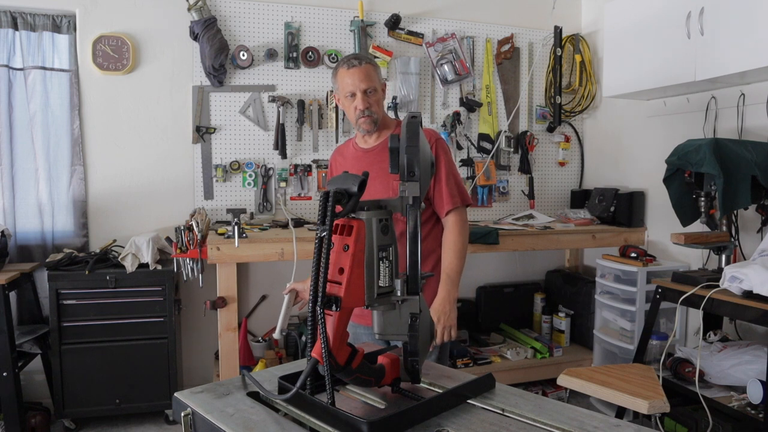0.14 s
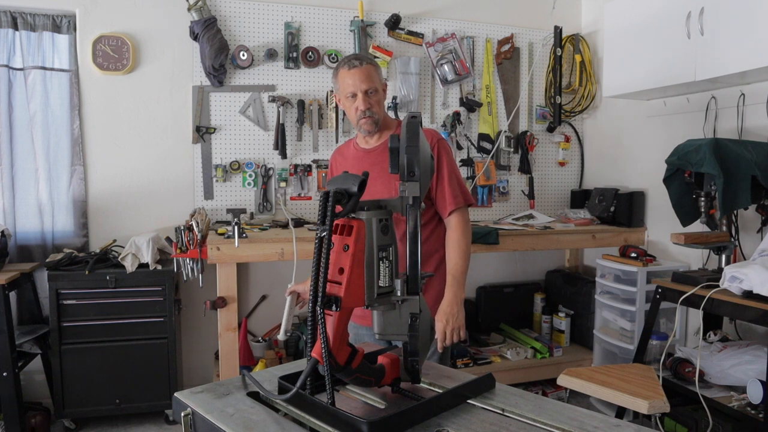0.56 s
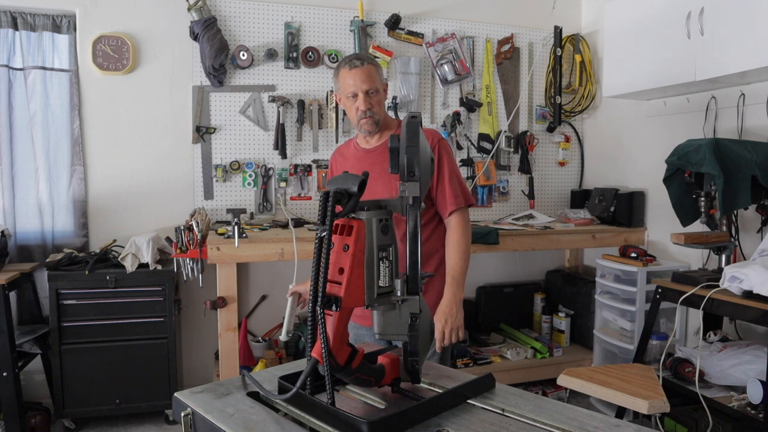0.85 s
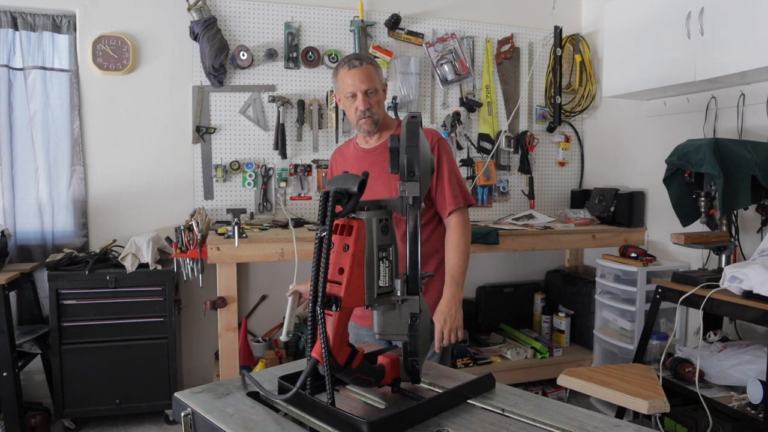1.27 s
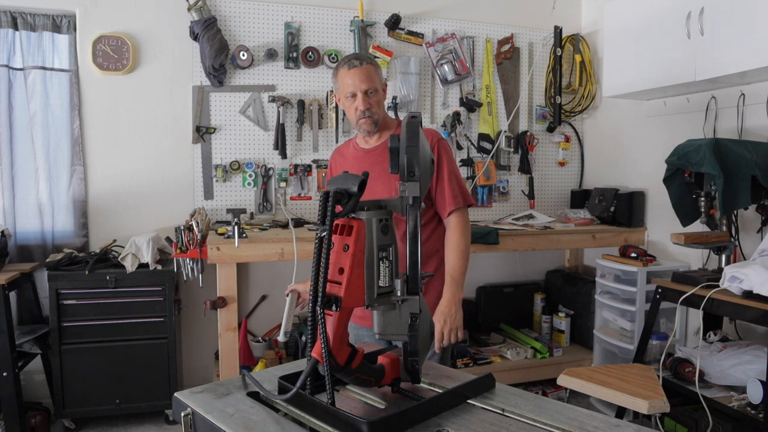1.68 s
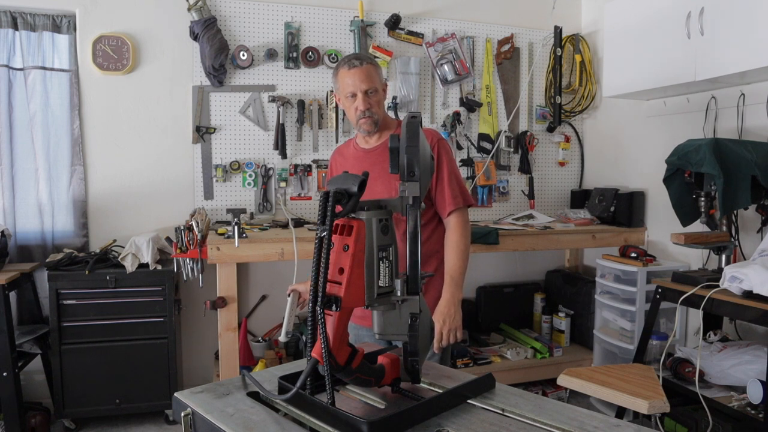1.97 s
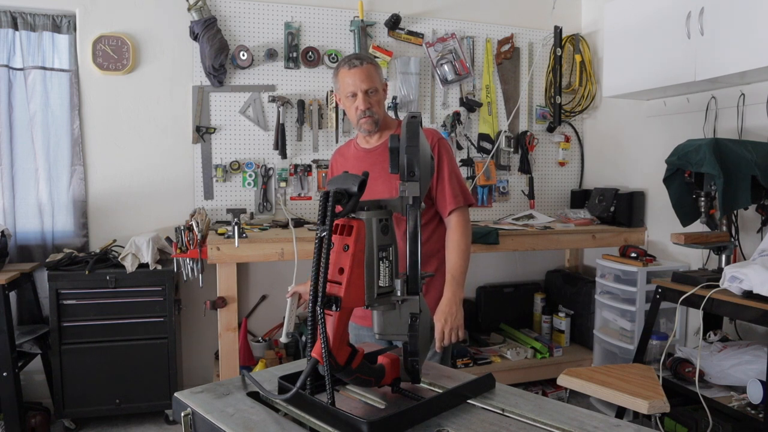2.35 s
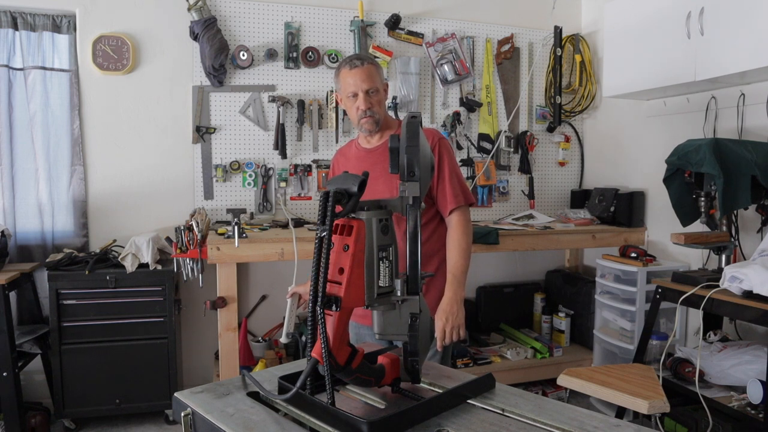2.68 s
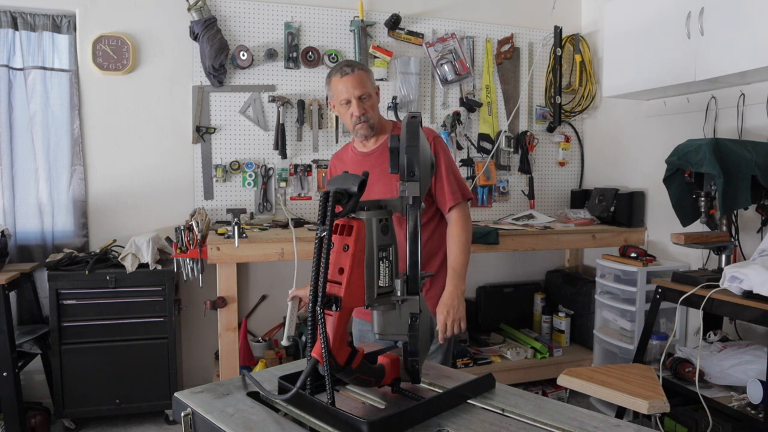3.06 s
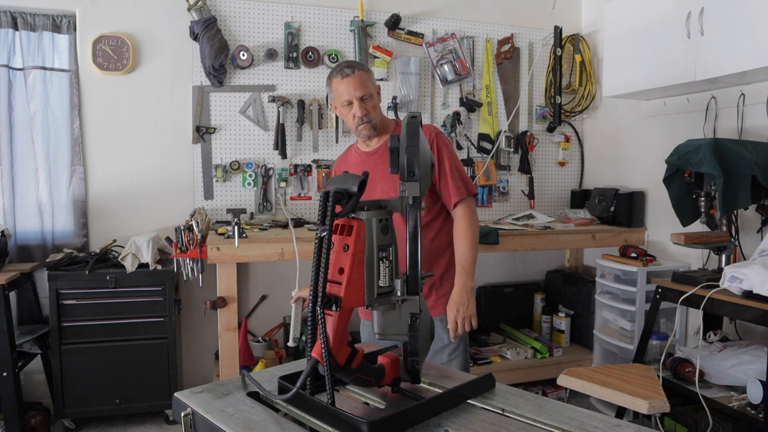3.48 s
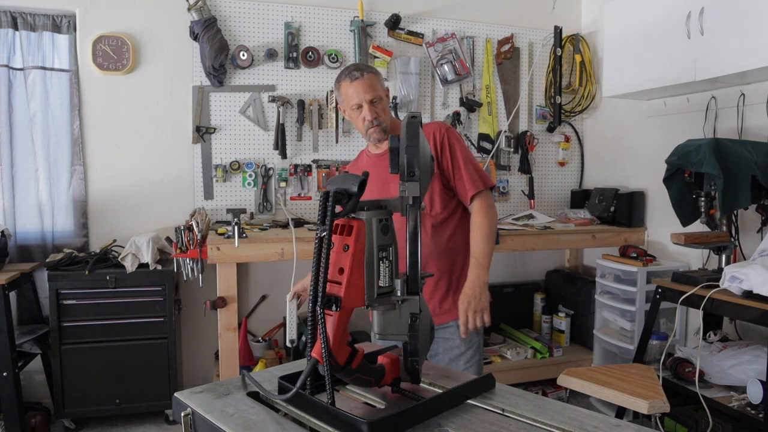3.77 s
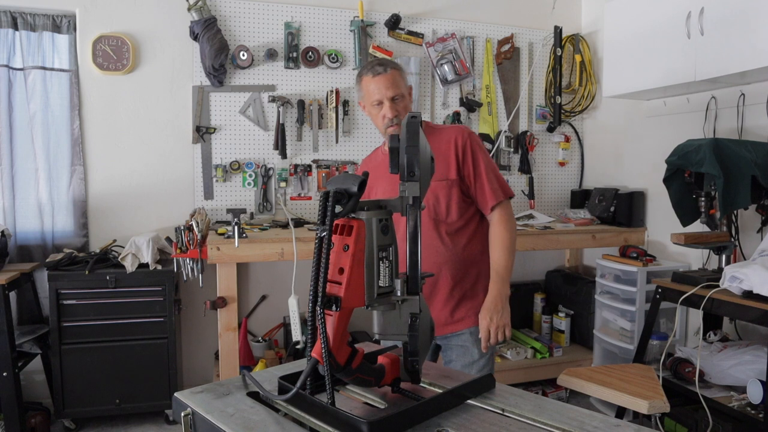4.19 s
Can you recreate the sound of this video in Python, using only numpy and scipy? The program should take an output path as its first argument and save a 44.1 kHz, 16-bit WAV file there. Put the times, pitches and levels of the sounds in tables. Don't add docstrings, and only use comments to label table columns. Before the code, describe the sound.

A portable band saw runs free in a garage workshop, picked up by one microphone a few metres away with short room reverberation. At the start it is already fast and still gaining speed: a loud, harsh, mid-to-high gear rattle with whining tones and rushing cooling air. At about 0.55 s the power is released and pitch and brightness sink; a very brief dropout interrupts the coasting at 0.76 s. The rattle dies by about 1.5 s into a rough blade whirr and low ringing, with tiny very high bearing chirps from 1.5 to 1.8 s. Another momentary dropout at 1.96 s coincides with an abrupt restart; the motor surges and rises rapidly, with low stand shudders. Released at about 3.2 s, it winds down again, its rattle thinning away around 4 s, ending with faint thin squeaks from 4.15 to 4.35 s over quiet shop air, mains hum and slight hiss.

```python
import sys
import numpy as np
from scipy import signal
from scipy.fft import rfft, irfft
from scipy.io import wavfile
from scipy.ndimage import uniform_filter1d

SR = 44100
rng = np.random.default_rng(int(sys.argv[2]) if len(sys.argv) > 2 else 0)


def master(y):
    cut = np.clip(np.atleast_2d(y).T, -1, 1)
    pcm = np.round(cut * 32767)
    wavfile.write(sys.argv[1], SR, pcm.astype(np.int16))


def invert_db(x):
    u = np.asarray(x, float) / 20
    return 10 ** u


N = 191161
TIME = np.arange(N) / SR
HZ = np.maximum(np.fft.rfftfreq(N, 1 / SR), 1)
FREE_HZ = 258

# (frequency [Hz], level [dB])
HOUSING_COLOUR = [(35, -86), (60, -41.5), (100, -34.5), (242, -21), (328, -15), (573, -7.5), (1180, -7),
                  (2260, 1.5), (2540, -1), (2920, 1.5), (3440, -1), (4050, -1.5), (6010, -10.5),
                  (8520, -16.5), (15600, -39.5)]
# (on [s], off [s], shaft rate when pulled [Hz], spin-up time constant [s])
TRIGGER_PULLS = [
    (0, .54, 219.1, .416),
    (1.965, 3.215, 56, .36),
]


def saw():
    # (frequency [Hz], level [dB])
    fan_colour = [(300, 7.5), (1200, 0.5), (2200, -3.5), (2900, 9), (3500, 4), (4500, -2), (6200, 4.5),
                  (12000, -4)]
    stand_hz, stand_width_hz = 101, 4
    mains_hz, mains_db = 120, -41.5

    speed, drive = shaft()
    hz = np.maximum(speed, 5)
    run_db, boom_db, ring_db, treble_db, stand_db = balance(speed, drive)
    turns = np.cumsum(hz) / SR
    teeth = level(rattle(turns, hz), 0)
    metal = level(causal(teeth + whines(turns, hz, drive), body_db(HZ)), 0)
    air_db = shape_db(HOUSING_COLOUR, HZ) + shape_db(fan_colour, HZ)
    fan = level(causal(rng.standard_normal(N), air_db), -2.86) * (hz / 250) ** 1.5

    spectrum = rfft(metal + fan)
    boom = 1 / (1 + (HZ / 1000) ** 4)
    treble = 1 / (1 + (5600 / HZ) ** 4)
    middle = np.maximum(1 - boom - treble, 0)
    parts = [(boom, boom_db), (treble, treble_db), (middle, 0)]
    housing = sum(invert_db(db) * irfft(spectrum * share, N) for share, db in parts)

    stand = invert_db(stand_db) * modes(teeth, [(stand_hz, stand_width_hz, 0)])
    field = drive * invert_db(mains_db + 2.5 * walk(8)) * np.sin(2 * np.pi * mains_hz * TIME)
    return invert_db(run_db) * (housing + invert_db(ring_db) * whirr(hz) + stand + field)


def shaft():
    friction_hz_per_s, drag_per_s, current_fade_s = 135, .51, .05
    offset_hz = friction_hz_per_s / drag_per_s
    hz, drive = np.zeros(N), np.zeros(N)
    for on, off, start_hz, spin_up in TRIGGER_PULLS:
        rising = FREE_HZ - (FREE_HZ - start_hz) * np.exp(-(np.minimum(TIME, off) - on) / spin_up)
        slowing = np.exp(-drag_per_s * np.maximum(TIME - off, 0))
        speed = (rising + offset_hz) * slowing - offset_hz
        current = np.clip(.5 + (off - TIME) / current_fade_s, 0, 1)
        hz = np.where(TIME >= on, speed, hz)
        drive = np.where(TIME >= on, current, drive)
    return hz, drive


def balance(speed, drive):
    # (shaft rate [Hz], level [dB])
    loudness = [(-19, -78), (-1, -66), (17, -50), (32.5, -38.5), (47, -29.5), (64.5, -27), (68, -24),
                (145, -23), (238.5, -22)]
    fade_lead = [3, -1.5]
    # (time [s], length [s], rise [dB])
    shudders = [
        (.62, .1, 9),
        (.95, .3, 7),
        (2.05, .15, 17),
        (2.43, .22, 14),
        (3.1, .4, 8),
        (3.6, .35, 11),
    ]
    steady_db = -25.5

    load = drive * (1 - speed / FREE_HZ)
    octaves = np.log2(np.maximum(speed, 1) / FREE_HZ)
    lead_hz = np.where(TIME < TRIGGER_PULLS[1][0], *fade_lead)
    coast_db = np.interp(speed - lead_hz, *np.transpose(loudness))
    dying_db = np.maximum(steady_db - coast_db, 0)

    run_db = coast_db + 6 * load
    boom_db = np.maximum(2 + 9.5 * octaves, -9.5) + 9.5 * load + 0.25 * dying_db
    treble_db = np.maximum(5.5 + 5 * octaves, -14) + 1.5 * load
    treble_db = treble_db - .2 * np.minimum(dying_db, 12)
    ring_db = np.minimum(-21.5 + 1.4 * dying_db, -4.5)
    shudder_db = sum(db * np.exp(-(2 * (TIME - s) / length) ** 2) for s, length, db in shudders)
    stand_db = -46 + 0.68 * dying_db + shudder_db
    return run_db, boom_db, ring_db, treble_db, stand_db


def rattle(turns, hz, per_tooth=1.5, scatter_db=3.5, throb=0.11):
    chance = rng.random((3, N))
    share = np.clip(per_tooth * 9 * np.maximum(hz, 40) / SR, 0, 1)
    size_db = np.minimum(-scatter_db * np.log(chance[2] + 1e-9), 12)
    sign = np.sign(chance[1] - .5)
    hits = (chance[0] < share) * sign * invert_db(size_db) / np.sqrt(share)
    scrape = level(rng.standard_normal(N), 3.3)
    lopsided = 1 + throb * np.cos(2 * np.pi * turns)
    return lopsided * (level(hits, 0) + scrape) * invert_db(0.95 * walk(3.1))


def whines(turns, hz, drive):
    # (multiple of shaft rate, driven level [dB], coasting level [dB])
    orders = [(1, -22, -17), (2, -19, -22), (7, -28, -36), (8, -26, -34), (9, -13, -18), (10, -25, -30),
              (11.5, -23, -36), (12, -12.5, -30), (12.5, -16, -36), (16, -15, -30), (18, -20, -25),
              (24, -16, -23), (27, -25, -28), (37.2, -19.5, -21), (42, -20, -21), (46.2, -21, -32)]
    # (multiple of shaft rate, driven level [dB], coasting level [dB])
    brushes = [(48, -14.5, -11), (60.4, -23, -21), (72, -17, -11), (96, -22, -11)]
    cap_hz, cap_width_hz = 10900, 3400

    wobble = lines(orders[:2], turns, hz, drive) * np.sqrt(np.minimum(200 / hz, 1.5))
    gears = lines(orders[2:], turns, hz, drive) * (hz / 235) ** 2
    cap = 1 / (1 + (2 * (HZ - cap_hz) / cap_width_hz) ** 4)
    commutator = irfft(rfft(lines(brushes, turns, hz, drive)) * cap, N)
    return wobble + gears + commutator


def lines(orders, turns, hz, drive, unsteady_db=2.3, drift=.04):
    out = np.zeros(N)
    for k, driven_db, coast_db in orders:
        db = coast_db + (driven_db - coast_db) * drive + unsteady_db * walk(12)
        cycles = k * turns + drift * walk(25) + rng.random()
        audible = k * hz < .4 * SR
        out += invert_db(db) * audible * np.sin(2 * np.pi * cycles)
    return out


def body_db(hz):
    # (frequency [Hz], width [Hz], boost [dB])
    resonances = [(259, 46, 4.5), (386, 44, 2), (572.2, 13.6, 11), (653, 114, 5.5), (729, 81, 6),
                  (840, 36, 5.5), (1427, 170, 4), (1740, 94, 2.5), (1846, 34, 3.5), (1890, 43, 3.5),
                  (2140, 20, 0.5), (2257, 85, 4), (2370, 51, 10), (2626, 930, -6), (2920, 140, -1),
                  (3080, 50, -1), (3332, 740, -10.5), (4013, 59, 4.5), (4250, 50, -2.5), (4800, 92, 3),
                  (1693, 41, 3), (5700, 81, -2.5), (6160, 1140, -5), (6900, 110, 3.5), (7320, 110, 6.5),
                  (8450, 390, 6.5), (9500, 110, -12), (10720, 460, 3.5), (12862, 350, 2), (14200, 400, 0)]
    peaks_db = sum(db / (1 + (2 * (hz - f) / w) ** 2) for f, w, db in resonances)
    return shape_db(HOUSING_COLOUR, hz) + peaks_db


def whirr(hz):
    rest_hz, slope, width_hz = 1173, 3.0, 370
    centre = rest_hz - slope * np.minimum(hz, 90)
    phase = 2 * np.pi * np.cumsum(centre) / SR
    return walk(width_hz) * np.cos(phase) + walk(width_hz) * np.sin(phase)


def modes(x, rows):
    ringing = sum(invert_db(db) * signal.lfilter(*signal.iirpeak(f, f / w, SR), x) for f, w, db in rows)
    return level(ringing, 0)


def squeaks():
    # (time [s], length [s], pitch [Hz], level [dB])
    cries = [
        (1.47, .08, 11900, -74),
        (1.565, .025, 12000, -66),
        (1.607, 0.035, 12050, -64),
        (1.67, .066, 12050, -63),
        (1.742, 0.025, 12100, -79),
        (1.78, .015, 12100, -80),
        (4.16, .05, 11850, -74),
        (4.22, 0.05, 12200, -61),
        (4.275, 0.078, 11900, -62),
    ]
    tone = np.zeros(N)
    for s, length, hz, db in cries:
        gate = np.clip(np.minimum(TIME - s, s + length - TIME) / 0.0072, 0, 1)
        tone += invert_db(db) * gate * np.sin(2 * np.pi * (hz * TIME + .1 * walk(300)))
    return tone * invert_db(3.0 * walk(150))


def room(x):
    t60_s, treble_t60_s, wet_db = 0.46, 0.23, -7
    t = TIME[:SR // 2]
    noise = rng.standard_normal(len(t))
    low = signal.sosfilt(signal.butter(2, 2500, fs=SR, output="sos"), noise)
    tail = low * invert_db(-60 * t / t60_s) + (noise - low) * invert_db(-60 * t / treble_t60_s)
    tail = tail * (t > .004)
    wet = signal.fftconvolve(x, tail * invert_db(wet_db) / np.sqrt(np.sum(tail ** 2)))[:N]
    return (x + wet) / np.sqrt(1 + invert_db(2 * wet_db))


def shop():
    # (frequency [Hz], level [dB])
    air_colour = [(35, -42), (60, 9.5), (372, 10), (491, -0.5), (762, 2), (875, -3), (1100, 3),
                  (1450, -13.5), (15000, -37)]
    # (frequency [Hz], level [dB])
    hum_tones = [(120, -76.5), (240, -75.5), (360.5, -71)]
    air = level(causal(rng.standard_normal(N), shape_db(air_colour, HZ)), -68)
    hum = sum(invert_db(db + 3.0 * walk(6)) * np.sin(2 * np.pi * f * TIME) for f, db in hum_tones)
    return air + hum


def level(x, db):
    return x * invert_db(db) / np.sqrt(np.mean(x ** 2))


def shape_db(points, hz):
    f, db = np.transpose(points)
    return np.interp(np.log(hz), np.log(f), db)


def causal(x, db):
    cepstrum = irfft(np.log(invert_db(db)), N)
    cepstrum[1:N // 2] *= 2
    cepstrum[N // 2 + 1:] = 0
    return irfft(rfft(x) * np.exp(rfft(cepstrum)), N)


def walk(rate):
    k = int(SR / rate)
    smooth = uniform_filter1d(rng.standard_normal(N), k)
    return level(uniform_filter1d(smooth, k), 0)


def scene():
    mono = room(saw()) + squeaks() + shop()
    return np.array([mono, mono])


def mute(lags):
    # (time [s], fall [s], recovery [s], curve power [1], depth [dB])
    mutes = [
        (0.76, 0.016, 0.049, 2.04, -52),
        (1.9644, 0.00197, 0.082, 2.3, -41),
    ]
    gain = np.ones(N)
    for (s, fall, rise, power, depth_db), slower in zip(mutes, lags):
        recovery = np.abs(TIME - s) ** power / (slower * rise) ** power
        opening = np.where(TIME < s, (s - TIME) / fall, recovery)
        gain = gain * np.clip(opening + invert_db(depth_db), 0, 1)
    return gain


def roll_off(x):
    return signal.sosfilt(signal.butter(12, 15760, fs=SR, output="sos"), x)


def record(dry):
    bass_lag = [3.7, 0.87]
    thin = signal.sosfilt(signal.butter(9, 93, "high", fs=SR, output="sos"), dry)
    bass = signal.sosfiltfilt(signal.butter(2, 220, fs=SR, output="sos"), thin)
    hiss = invert_db(-76.5) * rng.standard_normal(N)
    mix = (thin - bass + hiss) * mute([1, 1]) + bass * mute(bass_lag)
    return roll_off(mix)


dry = scene()
out = record(dry)
master(out)
```